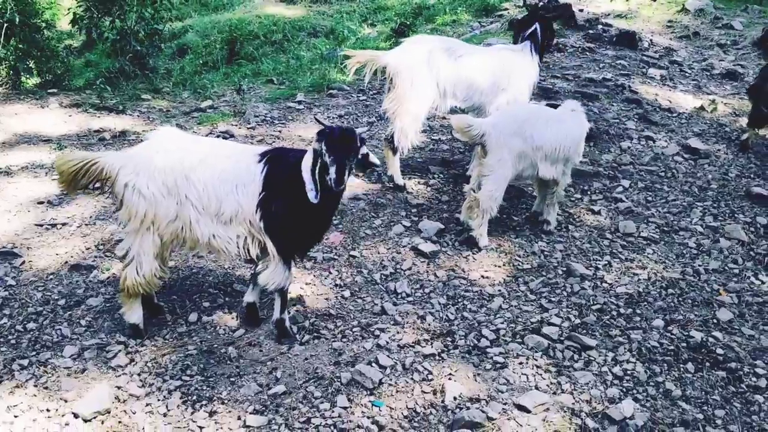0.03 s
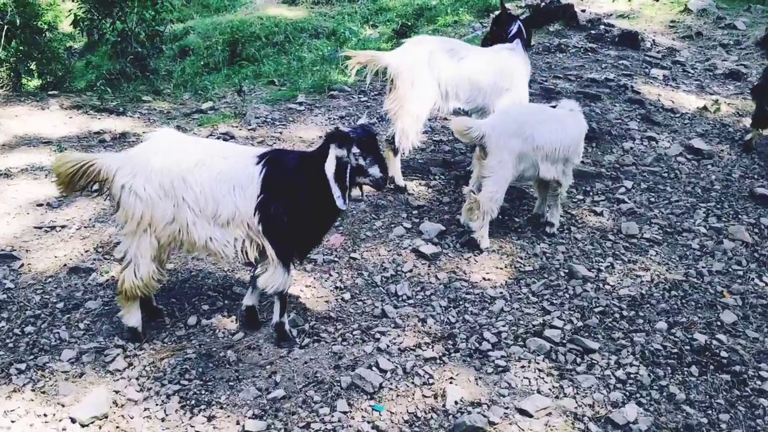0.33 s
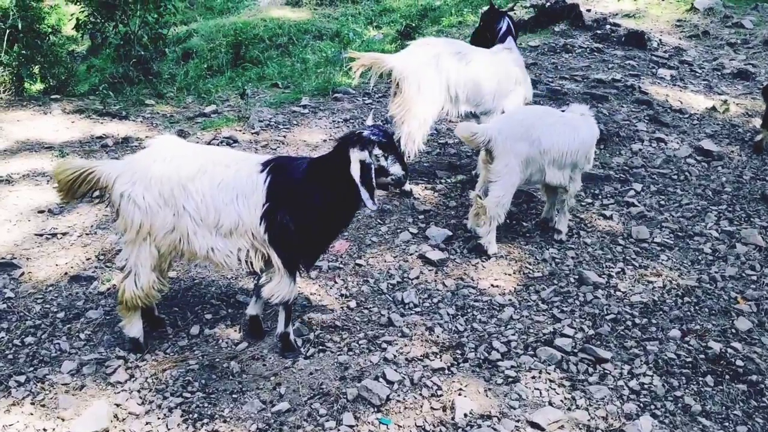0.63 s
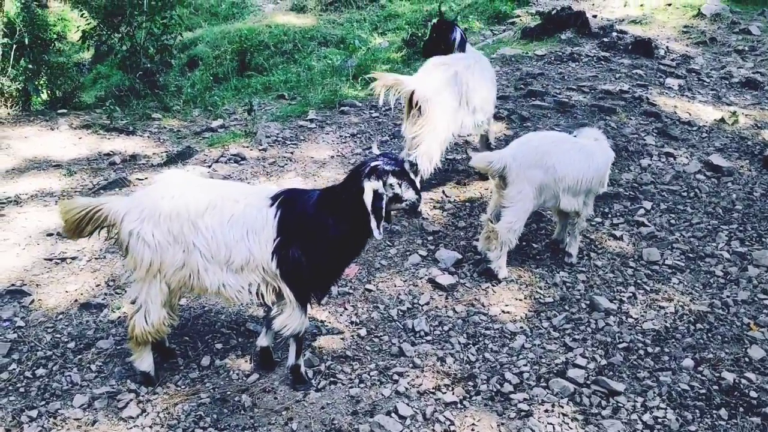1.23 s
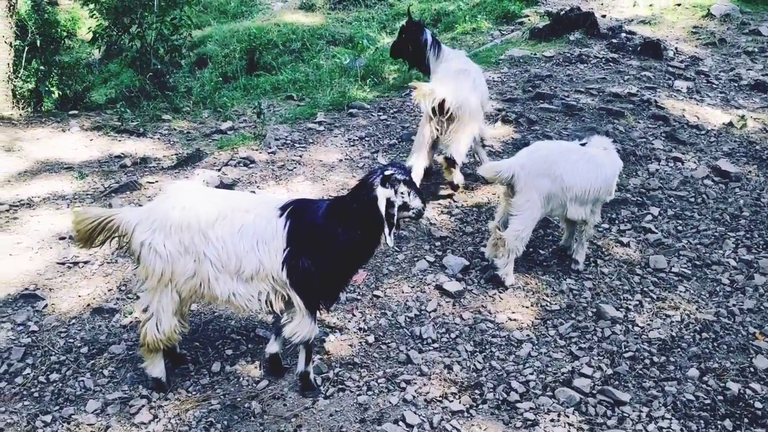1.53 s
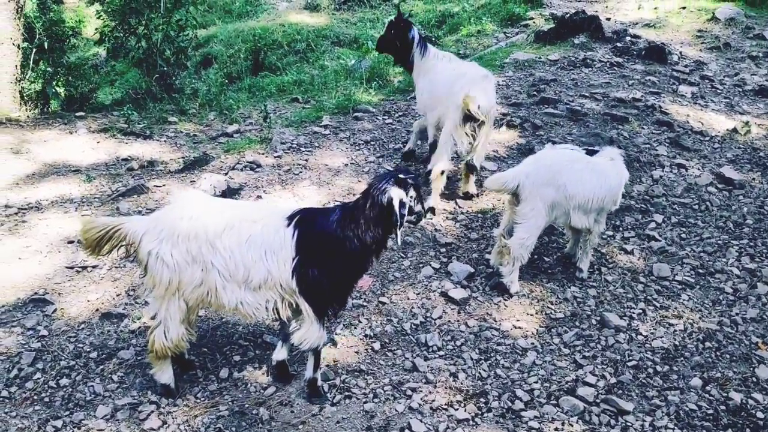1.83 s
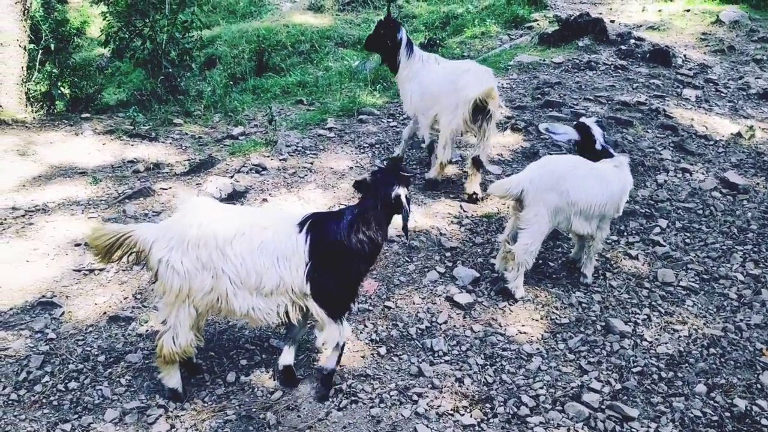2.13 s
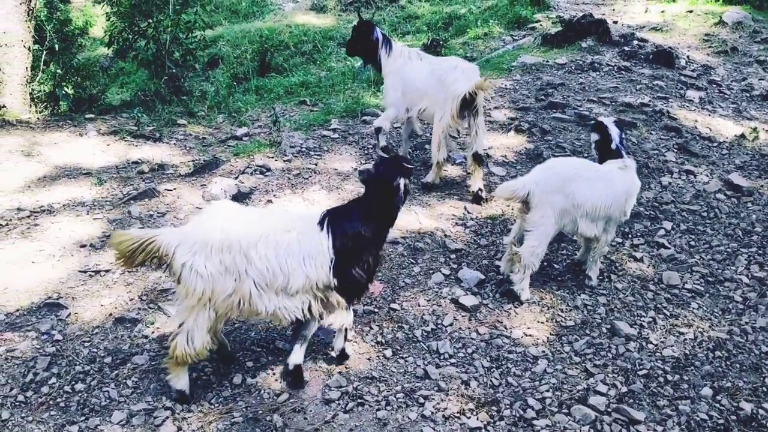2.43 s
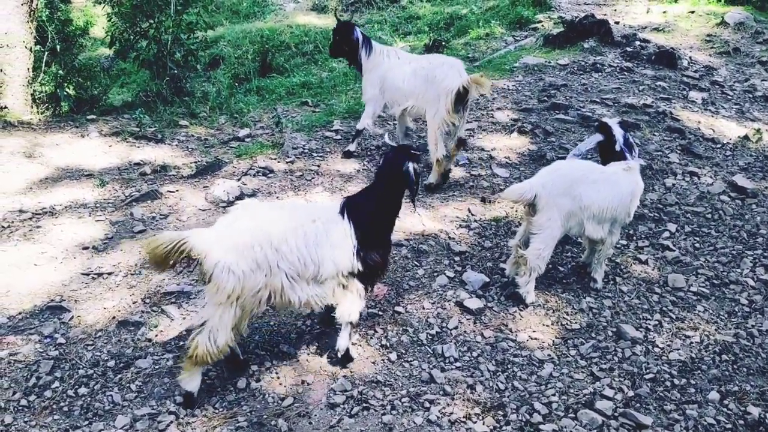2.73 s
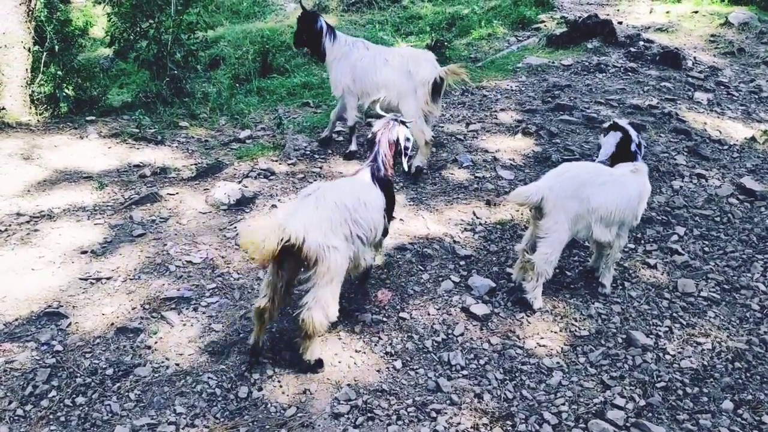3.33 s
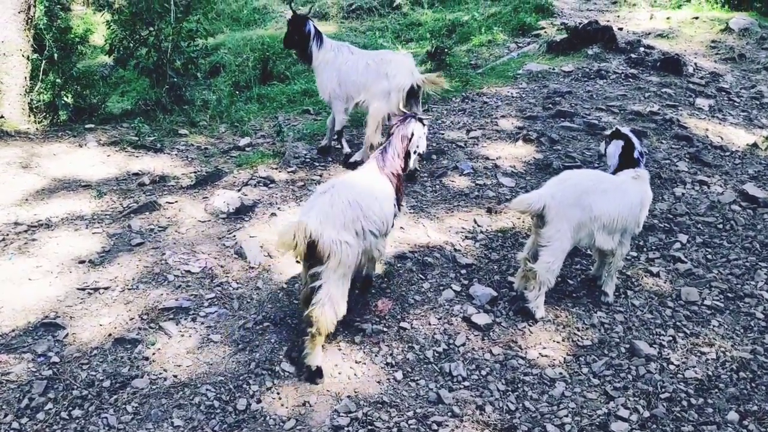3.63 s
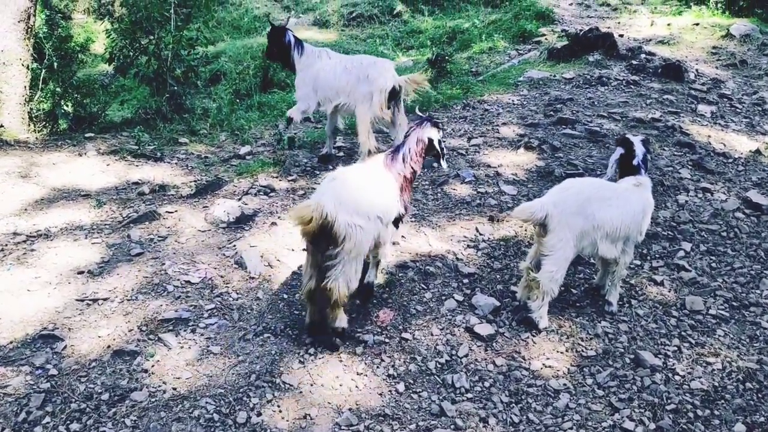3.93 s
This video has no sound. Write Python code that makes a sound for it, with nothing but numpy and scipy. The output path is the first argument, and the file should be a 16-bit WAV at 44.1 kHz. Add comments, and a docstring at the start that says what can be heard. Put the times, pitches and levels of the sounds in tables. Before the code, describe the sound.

Gusty wind rumbles on the microphone over goats stepping on stones and thin birdsong.

```python
"""Wind buffets the microphone from the start, almost only on its right port, over a hush and a faint
far-off drone. A bird chirps; goats shift about on loose slate, hooves scuffing grit, clicking stones
together and knocking on packed earth. A second bird joins on the right in thin arched whistles.
At 0.7 s one goat snorts through its nose. Around 3 s the hooves and stones get busier and the drone
sinks away; the wind blows hardest at the end."""
import sys
import numpy as np
from scipy import signal
from scipy.fft import rfft, irfft
from scipy.io import wavfile

SR = 44100
rng = np.random.default_rng(int(sys.argv[2]) if len(sys.argv) > 2 else 0)


def dump(signal):
    """Clip the signal to [-1, 1] and save it as 16-bit WAV at the path in sys.argv[1]."""
    limited = np.clip(np.atleast_2d(signal).T, -1, 1)
    pcm = np.round(limited * 32767).astype(np.int16)
    wavfile.write(sys.argv[1], SR, pcm)


N = 176400
TIME = np.arange(N) / SR


def from_db(db):
    """Decibels to gain."""
    return 10 ** (np.asarray(db) / 20)


def unit_rms(x):
    """Scale to an rms of 1."""
    return x / np.sqrt(np.mean(x ** 2) + 1e-20)


def automation(rows):
    """Draw each column's curve through its timed points, sample by sample."""
    times, *columns = np.transpose(rows)
    return np.array([np.interp(TIME, times, column) for column in columns])


def pan(db):
    """Constant-power gains; db is left minus right, so negative sits right."""
    return unit_rms(from_db(np.array([[db], [-db]]) / 2))


def add(out, start, x):
    """Mix a short sound in at start seconds."""
    i = max(int(start * SR), 0)
    out[:, i:i + x.shape[-1]] += x[..., :N - i]


def colour(x, spectrum):
    """EQ a steady sound to a curve, rolling off beyond both ends; rms 1."""
    hz, db = np.transpose(spectrum)
    f = np.maximum(np.fft.rfftfreq(N, 1 / SR), 1)
    curve = from_db(np.interp(np.log(f), np.log(hz), db))
    rolloff = (1 + (f / hz[-1] / 2) ** 4) * (1 + (hz[0] / f / 2) ** 4)
    return unit_rms(irfft(rfft(x) * curve / rolloff, N))


def noise(spectrum):
    """Coloured noise, unrelated left and right."""
    return colour(rng.standard_normal((2, N)), spectrum)


def wobble(rate_hz):
    """Smooth random modulation, rms 1."""
    lowpass = signal.butter(2, rate_hz, fs=SR, output="sos")
    return unit_rms(signal.sosfilt(lowpass, rng.standard_normal(N)))


def port_bleed(pair, likeness=.28, lag_s=.0005):
    """Part of the right port's sound reaches the left port a little later."""
    left, right = pair
    late = np.roll(right, int(lag_s * SR))
    return np.array([np.sqrt(1 - likeness ** 2) * left + likeness * late, right])


def eddy(width_ms):
    """A pointed pressure bump in the middle of 80 ms."""
    ms = np.arange(-40, 40, 1000 / SR)
    return (1 + (ms / width_ms / 1.5) ** 2) ** -1.5


# Gusts on the right port. Each row: time in seconds, level in dB.
GUSTS = [(0, -51.5), (.14, -53), (.2, -34.5), (.5, -36), (1.19, -32), (1.24, -48.5), (1.42, -44),
         (1.52, -35.5), (1.68, -32.5), (1.8, -41.5), (1.93, -37), (1.99, -51.5), (2.13, -48.5),
         (2.28, -38.5), (2.35, -40.5), (2.39, -33), (2.48, -36.5), (2.56, -48.5), (2.77, -46.5),
         (2.83, -38.5), (3.08, -49), (3.16, -32), (3.39, -37.5), (3.44, -52), (3.5, -35.5), (3.66, -30),
         (3.8, -32.5), (3.93, -30), (4, -31)]
# Strong eddies thumping a port. Each row: time in seconds, peak in dB before the low cut,
# width in ms, pan in dB.
BUFFETS = [(.210, -11, 1.88, -40), (0.306, -17, 2.3, -19), (0.337, -17.5, 0.51, 20),
           (0.405, -11.5, 1.6, -28), (.483, -18, 1.06, -27), (.633, -15.5, 1.14, -38),
           (0.948, -16, 0.93, -35), (1.068, -13, 1.06, -38), (1.186, -13, 1.94, -32),
           (1.614, -8.5, 1.7, -39), (1.665, -14.5, 0.85, -39), (1.674, -12.5, 0.81, -42),
           (1.697, -10, 1.36, -42), (1.768, -14, 1.62, -30), (1.933, -14.5, 1.57, -35),
           (2.208, -11, 2, -29), (2.389, -12, 0.97, -48), (2.812, -14, 1.36, -33), (3.152, -8.5, 1.8, -39),
           (3.2, -20, 1.2, -31), (3.48, -13, 1.15, -37), (3.572, -11, 1.14, -28), (3.615, -15.5, 1.6, -35),
           (3.622, -11.5, 0.75, -39), (3.638, -12.5, 1, -45), (3.753, -17.5, 0.83, -40),
           (3.842, -12.5, 0.88, -31), (3.908, -15, 0.92, -35), (3.915, -15.5, 0.55, -43),
           (3.919, -5, 1.38, -45), (3.937, -12, 0.97, -42)]
# Rumble on the exposed and the sheltered port. Each row: frequency in Hz, relative level in dB.
EXPOSED_RUMBLE = [(20, -12.5), (40, 0), (80, -6), (150, -11.5), (250, -27), (500, -45.5), (1000, -67)]
LEE_RUMBLE = [(20, 0.5), (40, 2), (80, -6.5), (150, -14.5), (250, -26), (500, -28.5), (1000, -54)]


def wind(eddies_per_s=110, middle_width_ms=2.31, low_cut_hz=43.7):
    """Eddies of many sizes pass the exposed port; the sheltered one mostly just rumbles."""
    swarm, buffets = np.zeros(N), np.zeros((2, N))
    gust_db = automation(GUSTS)[0]
    for width_ms in middle_width_ms * np.geomspace(.5, 2, 4):
        hits = (rng.random(N) < eddies_per_s / 4 / SR) * rng.uniform(.3, 1, N)
        halvings = np.log2(2 * middle_width_ms / width_ms)
        growth_db = .18 * halvings * (gust_db - gust_db.mean())  # gusts favour the small eddies
        swarm += from_db(growth_db) * signal.fftconvolve(hits - hits.mean(), eddy(width_ms), "same")
    for centre, db, width_ms, pan_db in BUFFETS:
        bump = eddy(width_ms)
        add(buffets, centre - len(bump) / 2 / SR, from_db(db) * bump * pan(pan_db) / np.sqrt(2))
    low_cut = signal.butter(1, low_cut_hz, "high", fs=SR, output="sos")
    lee = from_db(-51) * noise(LEE_RUMBLE)[0]
    rumble = from_db(.5) * noise(EXPOSED_RUMBLE)[1]
    churn = from_db(4.5) * unit_rms(signal.sosfilt(low_cut, swarm - swarm.mean()))
    exposed = from_db(gust_db) * (churn + rumble)
    return signal.sosfilt(low_cut, buffets) + np.array([lee, exposed])


# The dark tone of open air. Each row: frequency in Hz, relative level in dB.
AIR_EQ = [(100, 6), (300, 2.5), (600, 0.5), (1200, -3), (2200, -8), (4000, -12), (6000, -14.5), (7500, -14),
          (9500, -19.5), (14000, -20)]


def air():
    """A steady, wide bed of open-air hush."""
    return from_db(-62.5) * noise(AIR_EQ)


# The drone's fader moves. Each row: time in seconds, left level in dB, right level in dB.
DRONE_LEVELS = [(0, -62, -90), (.65, -62.5, -75), (1, -60.5, -66), (1.3, -63, -81), (1.6, -61, -67),
                (1.9, -60.5, -64), (2.3, -64.5, -72), (2.7, -62.5, -66), (3.1, -75, -91), (4, -70.5, -72)]
# Its narrow tone. Each row: frequency in Hz, relative level in dB.
DRONE_EQ = [(700, -31), (1080, -11.5), (1270, 0.5), (1370, 0.5), (1500, -2.5), (1950, -12), (3000, -42.5)]


def drone():
    """A far-off band of noise near 1.3 kHz swells and sinks, mostly on the left."""
    return from_db(automation(DRONE_LEVELS)) * noise(DRONE_EQ)


def bird(notes, pan_db, warble_depth, flutter_depth):
    """Each note is a slightly unsteady sine bending through its start, middle and end pitch."""
    out, warble, flutter = np.zeros((2, N)), wobble(370), wobble(110)
    for start, length, start_hz, mid_hz, end_hz, db in notes:
        position = np.linspace(-1, 1, int(length * SR))
        span = (int(start * SR) + np.arange(len(position))) % N
        edge_hz = np.where(position < 0, start_hz, end_hz)
        hz = mid_hz + (edge_hz - mid_hz) * np.abs(position) ** 1.6
        tone = np.sin(2 * np.pi * np.cumsum(hz * (1 + warble_depth * warble[span])) / SR)
        swell = (1 - position ** 4) * (1 + flutter_depth * flutter[span])
        add(out, start, from_db(db) * pan(pan_db) * tone * swell)
    return out


# The lower bird's calls. Each row: start in seconds, length in seconds, start, middle and end pitch
# in Hz, level in dB.
CHIRP_NOTES = [(.15, .07, 4150, 4680, 4720, -73), (.19, .095, 4700, 4480, 3690, -60.5),
               (.6, 0.083, 4650, 4720, 4500, -73), (.79, 0.068, 3800, 3850, 3800, -70),
               (.99, 0.066, 3650, 3730, 3600, -74), (2.43, 0.084, 4600, 4010, 3240, -79),
               (2.875, 0.12, 4600, 4720, 4130, -61), (3.39, .07, 4450, 4510, 4300, -75),
               (3.535, 0.067, 4600, 4220, 3680, -69)]


def chirps():
    """A small bird gives burry chirps, right of centre."""
    return bird(CHIRP_NOTES, pan_db=-11.5, warble_depth=.02, flutter_depth=.4)


def ring(clicks, hz, t60):
    """A damped mode struck by clicks, dying by 60 dB in t60 seconds."""
    radius, angle = from_db(-60 / (t60 * SR)), 2 * np.pi * hz / SR
    return signal.lfilter([0, np.sin(angle)], [1, -2 * radius * np.cos(angle), radius ** 2],
                          clicks + 1e-18)


# Hooves dragging through grit. Each row: start in seconds, length in seconds, level in dB, pan in dB.
HOOF_DRAGS = [(0.267, 0.13, -64.5, 3), (0.467, 0.12, -64.5, -14), (0.925, 0.19, -68, -14),
              (1.34, 0.045, -62.5, -8), (1.422, 0.046, -62, -6), (1.562, 0.22, -69, -8),
              (2.124, 0.12, -63, -8), (2.236, 0.033, -58.5, -6), (2.288, 0.016, -59.5, -6),
              (2.366, 0.05, -67, -21), (2.57, 0.12, -59.5, -3), (2.688, 0.32, -65, 1),
              (2.889, 0.25, -58, 3), (3.037, 0.18, -62.5, 4), (3.169, 0.057, -56, 2.5),
              (3.249, 0.093, -65.5, 7), (3.303, 0.43, -65, 3.5), (3.589, 0.14, -59, 3),
              (3.711, 0.064, -57.5, 4), (3.799, 0.032, -54.5, 4.5), (3.847, 0.27, -69, 1)]
# The crunch of the grit. Each row: frequency in Hz, relative level in dB.
GRIT_EQ = [(200, -8), (600, 5), (1200, -2), (2200, 3.5), (3200, -0.5), (4500, 1.5), (5800, -2.5),
           (7500, 2.5), (9500, -8.5), (14000, -8)]


def scuffs(release_s=.027, grains_per_s=2600, spread_db=5, ring_cycles=4.4):
    """Each drag of a hoof sets off a crowd of tiny ringing grains and a hiss of dust."""
    pressure = np.zeros((2, N))
    for start, length, db, pan_db in HOOF_DRAGS:
        rise = np.clip((TIME - start) / (.34 * length), 0, 1)
        fall = np.exp(-np.maximum(TIME - start - .65 * length, 0) / release_s)
        pressure += from_db(db) * pan(pan_db) * rise * fall
    sizes = from_db(spread_db * np.minimum(rng.exponential(1, N), 4))
    hits = sizes * (rng.random(N) < grains_per_s / SR) * rng.standard_normal((2, N))
    pitch_index = rng.integers(0, 20, N)
    grains = sum(ring(hits * (pitch_index == k), hz, ring_cycles / hz) * np.sqrt(hz)
                 for k, hz in enumerate(np.linspace(900, 14000, 20)))
    crunch = from_db(-5) * colour(grains, GRIT_EQ)
    dust = from_db(-1) * noise(GRIT_EQ)
    return pressure * port_bleed(crunch + dust)


CONTACT_S = .0015  # attack of a stone's crack or a hoof's knock
# Slate clicking on slate. Each row: start in seconds, relative level in dB, pitch in Hz, pan in dB.
STONE_HITS = [(0.334, -40, 7100, -14), (.875, -37, 2240, -19), (.930, -37, 4230, -9),
              (1.384, -39.5, 2650, 14), (1.429, -37.5, 6770, -22), (1.444, -38, 6400, -11),
              (1.46, -42, 10900, 9), (1.614, -33, 6450, -20), (1.676, -39, 4100, -7),
              (1.964, -41.5, 4900, -12), (2.250, -48, 4600, 0), (2.294, -38.5, 4400, -4),
              (2.301, -36, 3500, 5), (2.779, -36, 1310, -3), (2.978, -39, 6660, -8), (3.003, -38, 3300, 9),
              (3.059, -35, 4020, 6), (3.076, -35.5, 7940, -5), (3.109, -35, 7000, -11),
              (3.187, -30.5, 4820, 2), (3.209, -34.5, 5200, -4), (3.277, -40, 7800, -14),
              (3.435, -34.5, 3080, -4), (3.685, -30, 6900, -27), (3.693, -35, 7200, 2),
              (3.727, -39.5, 1900, -2), (3.769, -38, 7350, -6), (3.814, -33, 5950, -7),
              (3.828, -36.5, 6450, -6), (3.871, -39.5, 4720, 11), (3.936, -38.5, 2660, 19)]
# How a stone rings. Each row: ratio to its pitch, relative level in dB.
STONE_MODES = [(.42, -18), (.68, -30.5), (1, 4.5), (1.13, -20), (1.6, -32)]


def stones(ring_t60_s=.0088, ring_db=-15.5, crack_decay_s=.0031, crack_db=-18):
    """Stones meet with a rough crack and a few quickly dying modes, centred on their pitch."""
    out, t = np.zeros((2, N)), TIME[:SR // 20]
    ratios, mode_db = np.transpose(STONE_MODES)
    crush = np.minimum(t / CONTACT_S, 1) ** 2 * np.exp(-np.maximum(t - CONTACT_S, 0) / crack_decay_s)
    for start, db, hz, pan_db in STONE_HITS:
        phases = 2 * np.pi * rng.random((2, len(ratios), 1))
        modes = from_db(mode_db)[:, None] * np.sin(2 * np.pi * hz * ratios[:, None] * t + phases)
        ringing = modes.sum(axis=1) * from_db(-60 * t / ring_t60_s)
        band = signal.butter(1, [hz * .65, hz * 1.35], "band", fs=SR, output="sos")
        crack = unit_rms(signal.sosfilt(band, rng.standard_normal((2, len(t)))))
        gain = from_db(db) * pan(pan_db)
        add(out, start, gain * from_db(ring_db) * ringing)
        add(out, start - CONTACT_S / 2, gain * from_db(crack_db) * port_bleed(crack) * crush)
    return out


# Hooves set down. Each row: time in seconds, relative level in dB, pan in dB.
HOOF_FALLS = [(0.355, -52, -1), (1.385, -49, 9), (1.612, -50, -14), (2.277, -50, 18), (2.779, -77, 3),
              (2.92, -59.5, 7), (3.003, -60, 0), (3.19, -59, 6), (3.729, -71, 7)]
# The thud of packed earth. Each row: frequency in Hz, relative level in dB.
EARTH_EQ = [(150, -5), (400, 11), (750, -2.5), (1300, -6), (2500, -17)]


def steps(boost_db=5, decay_s=.01):
    """A hoof landing on packed earth gives a short dull knock."""
    weight = np.zeros((2, N))
    for landing, db, pan_db in HOOF_FALLS:
        t = TIME - landing
        knock = np.clip(1 + t / CONTACT_S, 0, 1) * np.exp(-np.maximum(t, 0) / decay_s)
        weight += from_db(db + boost_db) * pan(pan_db) * knock
    return weight * noise(EARTH_EQ)


# The higher bird's calls. Each row: start in seconds, length in seconds, start, middle and end pitch
# in Hz, level in dB.
WHISTLE_NOTES = [(.44, .08, 7500, 7660, 7570, -71), (.595, 0.048, 7800, 7770, 8000, -66),
                 (1.16, 0.039, 7250, 7560, 7380, -54), (1.195, 0.055, 7500, 7610, 7640, -54),
                 (1.295, 0.1, 7040, 7390, 7200, -61.5), (1.733, 0.047, 7050, 7520, 7780, -59),
                 (1.805, 0.066, 7750, 7700, 7400, -65), (1.888, 0.066, 7130, 7580, 6800, -59.5),
                 (2.008, 0.062, 7050, 7270, 7000, -67), (2.818, 0.053, 6800, 7800, 7730, -53),
                 (2.86, .062, 7630, 7590, 7100, -54), (2.965, 0.039, 7000, 7240, 7050, -54),
                 (3.03, .04, 7250, 7320, 7340, -62), (3.11, 0.031, 7100, 6990, 7030, -59)]


def whistles():
    """A small bird whistles thin and high, hard right."""
    return bird(WHISTLE_NOTES, pan_db=-40, warble_depth=.0044, flutter_depth=.44)


# Breath through a goat's nose. Each row: frequency in Hz, relative level in dB.
NOSE_EQ = [(400, 0), (650, -5), (850, 2.5), (1050, -0.5), (1350, -0.5), (1650, -3), (2000, -9),
           (2450, -9.5), (3100, -23), (4000, -15.5), (7500, -17), (10000, -24), (14000, -36)]


def snort(start_s=.708, attack_s=.017, hold_s=.023, decay_s=.055):
    """A goat blows a short fluttering puff through its nose."""
    t = TIME - start_s
    puff = np.clip(t / attack_s, 0, 1) * np.exp(-np.maximum(t - attack_s - hold_s, 0) / decay_s)
    flutter_db = 2 * wobble(140)
    return from_db(-49.5 + flutter_db) * puff * pan(-8.5) * port_bleed(noise(NOSE_EQ))


def hillside(x, t60, wet_db, predelay_s=.004):
    """Direct sound plus scatter from ground and trees."""
    t = TIME[:SR // 2]
    tail = rng.standard_normal((2, len(t))) * from_db(-60 * t / t60) * (t > predelay_s)
    tail /= np.sqrt(np.sum(tail ** 2, axis=1, keepdims=True))
    return x + from_db(wet_db) * signal.fftconvolve(x, tail, axes=1)[:, :N]


def scene():
    """Goats close by, birds in the trees, wind at the microphone."""
    goats = hillside(scuffs() + stones() + steps() + snort(), t60=.3, wet_db=-14)
    high_bird = hillside(whistles(), t60=1.0, wet_db=-3.5)
    low_bird = hillside(chirps(), t60=.6, wet_db=-1)
    return goats + high_bird + low_bird + air() + drone() + wind()


def record(dry):
    """A steep high cut at 14.4 kHz."""
    return signal.sosfilt(signal.ellip(10, .1, 70, 14400, fs=SR, output="sos"), dry)


dry = scene()
out = record(dry)
dump(out)
```